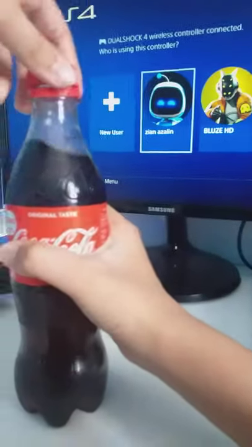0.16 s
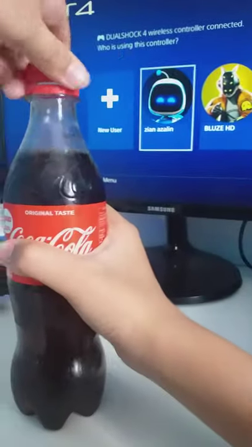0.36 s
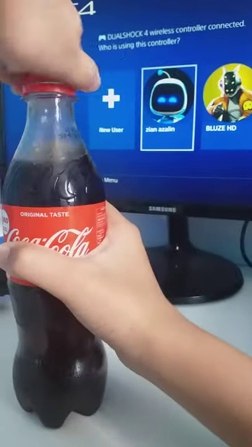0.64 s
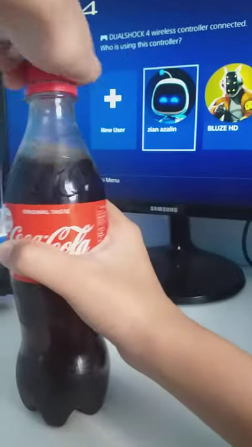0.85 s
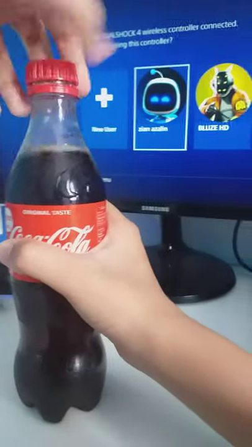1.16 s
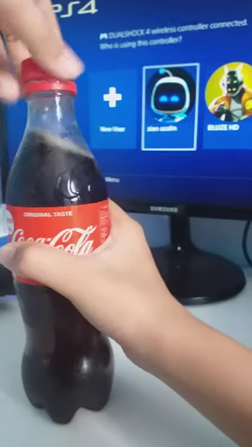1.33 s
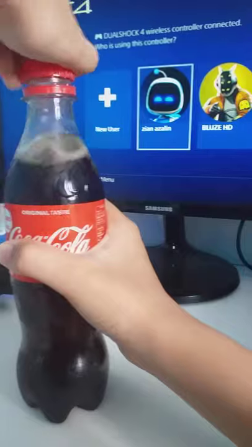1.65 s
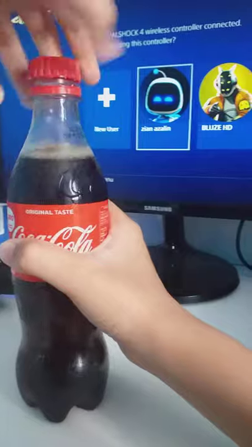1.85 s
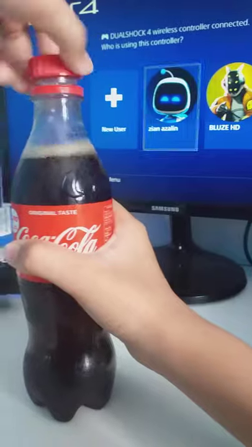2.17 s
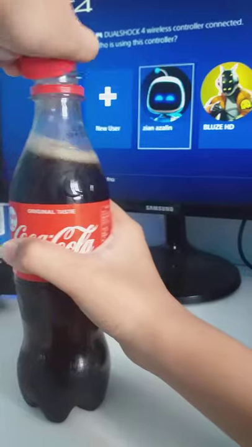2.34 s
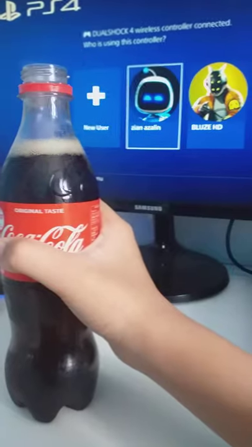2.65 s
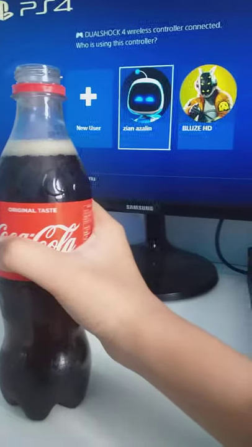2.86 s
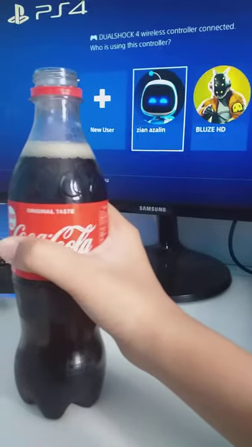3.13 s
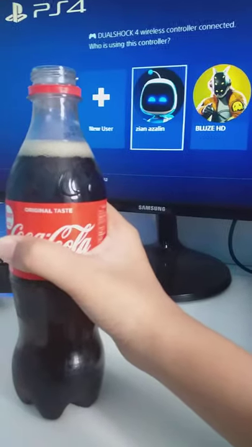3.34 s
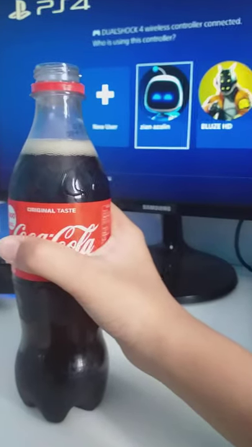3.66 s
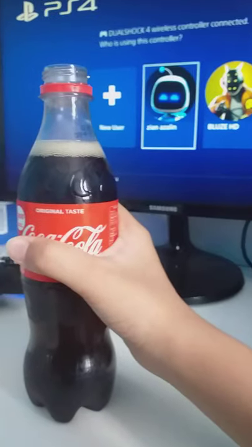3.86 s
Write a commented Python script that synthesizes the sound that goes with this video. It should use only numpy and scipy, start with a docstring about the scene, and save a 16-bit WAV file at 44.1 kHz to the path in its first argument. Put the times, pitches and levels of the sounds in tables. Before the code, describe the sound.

Plastic bottle cap being unscrewed with a gas puff and clicks, then clattering onto a desk

```python
"""A plastic screw cap is twisted off a soda bottle, close to a phone microphone in a small quiet room.
Shaped noise gives the room tone and hiss, random bubble clicks ring the bottle neck as a faint fizz,
and narrow noise whistles as a leak before a puff of gas. Seal and thread then crack and rub, ringing
the cap's modes; the hand thumps dully, the thread squeaks, and the neck pops as the cap comes free.
The cap drops on a desk, bounces, rolls and rattles to rest, ringing cap, desk and rim; the fizz goes on."""
import sys
import numpy as np
from scipy import signal
from scipy.io import wavfile

SR = 44100
rng = np.random.default_rng(int(sys.argv[2]) if len(sys.argv) > 2 else 0)


def inscribe(sig):
    """Save sig as 16-bit PCM at rate SR to the path in sys.argv[1].

    A 1-D sig is mono; a 2-D sig holds one channel per row.
    Samples are clipped to [-1, 1] before scaling.
    """
    pcm = np.round(np.clip(np.atleast_2d(sig).T, -1, 1) * 32767)
    wavfile.write(sys.argv[1], SR, pcm.astype(np.int16))


def volts(x):
    """Linear amplitude factor 10**(x/20) for a level x in dB, scalar or array-like."""
    e = np.asarray(x, float) / 20
    return 10 ** e


N = 176400   # four seconds of samples
BASS_BELOW_HZ, TREBLE_ABOVE_HZ = 1800, 6000   # how the cap's modes are grouped


def rms_one(x):
    """Scale to an average (rms) level of 1."""
    return x / np.sqrt(np.mean(x ** 2) + 1e-20)


def cut(x, hz, kind, order=2):
    """Butterworth filter."""
    return signal.sosfilt(signal.butter(order, hz, kind, fs=SR, output="sos"), x)


def in_time(rows):
    """Draw a curve through rows that start with a time; one value per sample for each other column."""
    s, *columns = np.transpose(rows)
    return [np.interp(np.arange(N) / SR, s, c) for c in columns]


def gated(rows):
    """Gain of a level curve, fading in and out over 20 ms at its ends."""
    t = np.arange(N) / SR
    fade = np.clip(np.minimum(t - rows[0][0], rows[-1][0] - t) * 50, 0, 1)
    return volts(in_time(rows)[0]) * fade


def at_hz(points, hz):
    """Read a table of (Hz, value) on a logarithmic pitch axis."""
    table_hz, values = np.transpose(points)
    return np.interp(np.log(hz), np.log(table_hz), values)


def drift(rate):
    """Slow random wandering: 'rate' fresh values per second, joined by lines."""
    knots = rng.standard_normal(400)
    return np.interp(np.arange(N) / SR * rate, np.arange(400), knots)


def grains(per_s, spread_db):
    """Random clicks of uneven size and either sign."""
    sizes = volts(spread_db * np.minimum(rng.exponential(1, N), 5)) * rng.choice([-1, 1], N)
    return sizes * (rng.random(N) < per_s / SR)


def ring(clicks, hz, t60):
    """A resonance: a click of size 1 starts a sine of height 1 that falls 60 dB in t60 seconds."""
    r, w = volts(-60 / (max(t60, 1 / hz) * SR)), 2 * np.pi * hz / SR
    return signal.lfilter([0, np.sin(w)], [1, -2 * r * np.cos(w), r * r], clicks + 1e-18)


# edges of the third-octave bands, in Hz
EDGES_HZ = np.minimum(30 * 2 ** np.arange(0, 9.4, 1 / 3), 17000)


def bands(x):
    """Split a sound into third-octave bands, each with its centre in Hz."""
    for low, high in zip(EDGES_HZ, EDGES_HZ[1:]):
        yield np.sqrt(low * high), cut(x, [low, high], "band")


def coloured(spectrum, patchy_db):
    """Noise of a given spectrum, each band wavering a little."""
    out = 0
    for hz, band in bands(rng.standard_normal(N)):
        out = out + volts(at_hz(spectrum, hz) + patchy_db * drift(11)) * band
    return rms_one(out)


def strike(s, db, modes, detune=0., scatter_db=3.5):
    """Blows at times s, with db as blows x modes: after a short loading, each mode rings and dies away."""
    load_s, slip_s = 0.0008, 0.0003   # fixed wait, and largest random extra wait of each mode
    shape = (len(s), len(modes))
    luck, late, bend = rng.standard_normal(shape), rng.random(shape), rng.standard_normal(shape)
    hz, level_db, t60 = np.transpose(modes)[:, :, None]
    out, t = np.zeros(N + SR), np.arange(SR // 8) / SR
    for k, start in enumerate(s):
        age = np.maximum(t - load_s - slip_s * late[k, :, None], 0)
        decay_db = -60 * age / np.maximum(t60, 1 / hz)
        size = volts(db[k, :, None] + level_db + scatter_db * luck[k, :, None] + decay_db)
        rings = size * np.sin(2 * np.pi * hz * (1 + detune * bend[k, :, None]) * age)
        # neighbouring modes push in opposite directions
        out[int(start * SR):][:len(t)] += rings[::2].sum(axis=0) - rings[1::2].sum(axis=0)
    return out[:N]


# Level of the room tone. Each row: time in seconds, level in dB.
AIR_LEVEL = [(0, -72), (.4, -75), (.48, -85.5), (.62, -70), (1.2, -63), (1.65, -67), (1.8, -63), (4, -65)]
# Colour of the room tone. Each row: pitch in Hz, relative level in dB per Hz.
AIR_COLOUR = [(45, -5.5), (95, -0.5), (215, -12.5), (400, -15), (1000, -20.5), (1800, -33.5), (2400, -30.5),
              (5000, -26), (9500, -35.5), (16000, -31)]


def room_tone():
    """Quiet background noise, strongest in the bass, whose bands waver gently."""
    air = cut(coloured(AIR_COLOUR, patchy_db=2.0), 38.1, "high", order=4)
    return volts(in_time(AIR_LEVEL)[0]) * air


# Level of the treble hiss. Each row: time in seconds, level in dB.
HISS_LEVEL = [(0, -86), (.49, -81), (.55, -77), (.72, -70.5), (1.65, -92), (2.5, -73), (4, -80)]


def treble_hiss():
    """Plain noise above 3 kHz that swells and fades."""
    return volts(in_time(HISS_LEVEL)[0]) * rms_one(cut(rng.standard_normal(N), 3000, "high"))


# Lowest air mode of the neck, rising as the cap lifts. Each row: time in seconds, pitch in Hz.
NECK_GLIDE = [(0, 597), (2.0, 521), (2.2, 567), (2.245, 670), (2.276, 764), (2.7, 850)]


def neck_air(x):
    """A resonance whose centre glides: shift down, low-pass, shift back."""
    width_hz = 22.7
    turn = np.exp(2j * np.pi * np.cumsum(in_time(NECK_GLIDE)[0]) / SR)
    r = np.exp(-np.pi * width_hz / SR)
    return 2 * np.real(turn * signal.lfilter([1 - r], [1, -r], x / turn))


# Loudness of the bubbles heard through the neck. Each row: time in seconds, relative level in dB.
FIZZ_LEVEL = [(0, -78), (.45, -77.5), (1.9, -68), (2.5, -72), (3, -74), (4, -71.5)]
# Upper air modes of the neck. Each row: pitch in Hz, width in Hz, relative level in dB.
NECK_MODES = [(2370, 180, -6.5), (3900, 140, -0.5)]


def fizz():
    """Bursting bubbles, as random clicks, excite the air column of the neck."""
    fizz_db, glide_db = -4.5, -7   # whole fizz, and its share through the lowest air mode
    bursts = grains(1700 * volts(1.1 * drift(44)), 5.1)   # around 1700 bursts per second
    out = volts(glide_db) * rms_one(neck_air(bursts))
    for hz, width, db in NECK_MODES:
        t60 = np.log(1000) / np.pi / width   # a wider mode dies sooner
        out = out + volts(db) * rms_one(ring(bursts, hz, t60))
    return volts(in_time(FIZZ_LEVEL)[0] + fizz_db) * out


# Thin whistle before the seal gives. Each row: time in seconds, level in dB.
LEAK_LEVEL = [(0, -83), (.3, -75.5), (.45, -96)]


def leak():
    """Gas whistles thinly: noise through two narrow resonances at one pitch, one slightly wider, in a row."""
    hz, width_hz = 5080, 730
    once = ring(rng.standard_normal(N), hz, 2.2 / width_hz)
    whistle = rms_one(ring(once, hz, 2.0 / width_hz))
    from_before = [(-1, LEAK_LEVEL[0][1])] + list(LEAK_LEVEL)   # already sounding at the start
    return gated(from_before) * whistle


# Colour of the escaping gas. Each row: pitch in Hz, relative level in dB per Hz.
GAS_COLOUR = [(1000, -38), (2000, -18), (3500, -8.5), (5200, 2), (7500, -1), (9300, -3), (12500, 1),
              (16000, -5.5)]


def puff():
    """Gas rushes out: noise under a short hump, with a softer skirt that fades more slowly."""
    peak_s, peak_db, hump_s = 0.3337, -42.5, 0.0098
    tail_db, rise_t60_s, fall_t60_s = -7, 0.1, 0.21   # tail level is relative to the hump
    t = np.arange(N) / SR - peak_s
    hump = np.exp(-(t / hump_s) ** 2 / 2)
    tail = volts(tail_db - 60 * np.abs(t) / np.where(t > 0, fall_t60_s, rise_t60_s))
    return volts(peak_db) * (hump + tail) * coloured(GAS_COLOUR, patchy_db=0.1)


# Ringing modes of the cap. Each row: pitch in Hz, relative level in dB, time to fall 60 dB in seconds.
CAP_MODES = [(980, -10, 0.0068), (1383, -10.5, 0.0073), (1980, -19.5, 0.0043), (2533, -7.5, 0.0068),
             (3090, 1.5, 0.0044), (3900, -0.5, 0.0059), (4540, 4, 0.0042), (5346, -8.5, 0.014),
             (6330, -4, 0.0044), (7560, -2, 0.0038), (11930, -1.5, 0.0026), (14700, -3, 0.002)]


def cap_blows(rows):
    """Sharp blows ring the cap, favouring the modes near each blow's strongest pitch."""
    blow_db, favour_db, favour_octaves = -13, 8.5, 0.32
    s, db, peak_hz, bass_db, treble_db = np.transpose(rows)[:, :, None]
    hz = np.array(CAP_MODES)[:, 0]
    level = db + blow_db + favour_db * np.exp(-(np.log2(hz / peak_hz) / favour_octaves) ** 2)
    level = level + bass_db * (hz < BASS_BELOW_HZ) + treble_db * (hz > TREBLE_ABOVE_HZ)
    # detune: each blow finds the modes at a slightly different pitch
    return strike(s[:, 0], level, CAP_MODES, detune=0.05, scatter_db=2)


# Seal and thread cracks. Each row: start in seconds, relative strength in dB, strongest pitch in Hz,
# extra bass in dB, extra treble in dB.
CRACKS = [(0.4987, -23, 4180, -4, 9), (0.5209, -38, 6000, -12, 12), (0.531, -29.5, 9000, -27, 15),
          (0.565, -16.5, 4900, -3, 8.5), (0.601, -37, 3560, -7, -3), (0.789, -24, 3360, -0.5, -6),
          (0.976, -19.5, 3480, -23, -7), (1.0326, -32, 2430, 7.5, -17), (1.0561, -32, 3900, -9, -5),
          (1.0726, -31, 3020, 9.5, -4), (1.1875, -39, 3740, -12, -14), (1.2, -37.5, 3840, -4, 0.5),
          (1.2484, -17.5, 4650, -29, -6), (1.354, -30.5, 4130, 7, -5), (1.4111, -34, 2740, 18.5, -17),
          (1.419, -35, 3800, -6, -6), (1.48, -31.5, 3700, 16.5, -20), (1.5064, -45, 3900, 6, -2),
          (1.7406, -20.5, 2370, -1.5, -11), (1.894, -26.5, 4140, -35, 9), (2.038, -28, 3870, -26, -17),
          (2.0651, -28.5, 3660, -19, -19), (2.1338, -30.5, 3870, -15, 4), (2.1438, -33.5, 3570, 10, -8),
          (2.1991, -18, 2870, 11.5, -12), (2.2423, -19.5, 4000, 13.5, -2), (2.274, -19, 4130, 12, 0.5)]


def cracks():
    """Seal and thread give way in sudden jerks that ring the cap."""
    return cap_blows(CRACKS)


# How long the room rings. Each row: pitch in Hz, time to fall 60 dB in seconds.
ROOM_T60 = [(200, 0.95), (1000, 0.44), (4000, 0.3), (8000, 0.28), (15000, 0.39)]


def room(close, far):
    """Reflections from screen and bottle close by, and a far-wall tail that dies band by band."""
    near_db, near_t60_s, far_db = -2.5, 0.017, -9.5
    t = np.arange(SR // 2) / SR
    near = rng.standard_normal(len(t)) * volts(-60 * t / near_t60_s) * (t > 0.001)
    near = volts(near_db) * near / np.linalg.norm(near)
    tail = sum(b * volts(-60 * t / at_hz(ROOM_T60, hz)) for hz, b in bands(rng.standard_normal(len(t))))
    tail = volts(far_db) * tail * (t > 0.004) / np.linalg.norm(tail)
    return (signal.fftconvolve(close, near) + signal.fftconvolve(far, tail))[:N]


# Turns of the cap rubbing on the thread. Each row: start in seconds, length in seconds,
# level of the upper modes in dB, relative bass in dB.
RUBS = [(0.57, 0.24, -69.5, -31), (0.981, 0.19, -59.5, -0.5), (1.154, 0.31, -73.5, 8),
        (1.367, 0.16, -64.5, -4), (1.471, .11, -53, -13), (1.674, 0.054, -66.5, -6),
        (1.993, 0.048, -60, 1.5), (2.023, 0.2, -53, -4.5), (2.168, 0.2, -53.5, 1),
        (2.276, 0.37, -66.5, 1.5)]


def rubbing():
    """The thread sticks and slips: clumps of tiny clicks ring the cap's modes, turn by turn."""
    treble_trim_db, bass_trim_db, edge_s = -12, -6.5, 0.019
    t = np.arange(N) / SR
    # two streams of slips, shared out among the modes
    slips = [grains(1200 * volts(9 * drift(90)), 4) for _ in range(2)]
    low, high = 0, 0
    for k, (hz, db, t60) in enumerate(CAP_MODES):
        sound = ring(slips[k % 2], hz, t60) * volts(db + treble_trim_db * (hz > TREBLE_ABOVE_HZ))
        if hz < BASS_BELOW_HZ:
            low = low + sound
        else:
            high = high + sound
    low, high = rms_one(low), rms_one(high)
    out = np.zeros(N)
    for s, length, db, bass_db in RUBS:
        # quick rise, then a fade over the second half
        shape = np.clip(np.minimum((t - s) / edge_s, 2 * (s + length - t) / length), 0, 1)
        out += volts(db) * shape * (high + volts(bass_db + bass_trim_db) * low)
    return out


# Hand on the bottle. Each row: time in seconds, level in dB.
THUMP_LEVEL = [(0.95, -74), (1.056, -52.5), (1.2, -85), (1.7, -80), (1.75, -56), (1.86, -81)]


def hand_thump():
    """Dull pushes of the hand: low noise that swells and fades."""
    low_hz, high_hz = 70.6, 240
    noise = cut(cut(rng.standard_normal(N), high_hz, "low", order=1), low_hz, "high")
    return gated(THUMP_LEVEL) * rms_one(cut(noise, 4 * high_hz, "low"))


# Squeaks of the thread. Each row: middle in seconds, pitch in Hz, level in dB,
# time from the middle to about a third of the height in seconds.
SQUEAKS = [(1.399, 1480, -50, .009)]


def squeak():
    """The thread squeaks: a short tone under a bell-shaped hump."""
    t = np.arange(N) / SR
    return sum(volts(db) * np.exp(-((t - s) / length) ** 2) * np.sin(2 * np.pi * hz * t)
               for s, hz, db, length in SQUEAKS)


# Pops of the neck. Each row: start in seconds, level in dB, pitch in Hz, time to fall 60 dB in seconds.
POPS = [(2.276, -30.5, 755, 0.06)]


def pop():
    """The neck rings as the cap comes free."""
    return sum(ring(volts(db) * (np.arange(N) == int(s * SR)), hz, t60) for s, db, hz, t60 in POPS)


# Cap landing on the desk. Each row: start in seconds, relative strength in dB, strongest pitch in Hz,
# extra bass in dB, extra treble in dB.
DROPS = [(3.152, -7, 4360, -2.5, 2.5), (3.1573, -18.5, 4340, -25, -21), (3.2992, -17.5, 7400, -10, -2.5),
         (3.303, -18, 7300, 7.5, 4), (3.311, -9.5, 7600, -31, 5), (3.316, -14, 4400, -10, 6),
         (3.3189, -30, 4070, -24, 9)]


def landings():
    """The cap itself rings as it lands, its treble dulled above about 8.5 kHz."""
    return cut(cap_blows(DROPS), 8450, "low")


# A single desk mode below the crowd: pitch in Hz, relative level in dB, time to fall 60 dB in seconds.
DESK_BELOW_CROWD = (468, 1, .1)


def desk_modes():
    """A single longer mode, and above it a crowd of short modes, shorter the higher they are."""
    from_hz, to_hz, cycles, tilt_db = 874, 2847, 53.6, 1   # each rings for so many cycles; tilt per octave
    crowd_hz = np.geomspace(from_hz, to_hz, num=22) * rng.uniform(0.98, 1.02, 22)
    return [DESK_BELOW_CROWD] + [(hz, tilt_db * np.log2(hz / from_hz), cycles / hz) for hz in crowd_hz]


def desk_knocks(modes):
    """Landings and rim touches set the desk ringing."""
    knock_db, touch_db = -32, 11   # all knocks; extra for the rim touches
    knocks = [row[:2] for row in DROPS] + [(s, db + touch_db) for s, db in TOUCHES]
    s, db = np.transpose(knocks)
    return strike(s, db[:, None] + knock_db + np.zeros(len(modes)), modes, scatter_db=2)


def desk_boom():
    """The desk's low boom under the first landing."""
    hz, db, t60_s = 117.8, -50.5, 0.48
    landing = volts(db) * (np.arange(N) == int(DROPS[0][0] * SR))
    return cut(ring(landing, hz, t60_s), hz * np.array([0.6, 1.4]), "band")


# Cap rolling on the desk. Each row: time in seconds, level in dB.
ROLL_LEVEL = [(3.33, -42), (3.48, -54), (3.6, -65.5), (3.85, -73), (3.95, -107)]


def rolling(modes):
    """The rolling cap's many tiny bumps keep the desk's modes ringing."""
    bumps = grains(900, 4.83)
    return gated(ROLL_LEVEL) * rms_one(sum(volts(db) * ring(bumps, hz, t60) for hz, db, t60 in modes))


# Rim touches as the cap rattles to rest. Each row: start in seconds, relative strength in dB.
TOUCHES = [(3.3566, -27), (3.3694, -44), (3.3807, -31), (3.3894, -34), (3.3978, -30), (3.4066, -35),
           (3.4153, -36), (3.422, -39), (3.4284, -39), (3.4341, -37.5), (3.4393, -36), (3.444, -48),
           (3.454, -45), (3.4847, -45), (3.5413, -46), (3.6266, -53), (3.677, -63)]
# Ringing of the rim. Each row: pitch in Hz, relative level in dB, time to fall 60 dB in seconds.
RIM_MODES = [(7540, 4.5, 0.0023)]


def rim():
    """Each touch ticks in the rim's modes."""
    s, db = np.transpose(TOUCHES)
    ticks = strike(s, db[:, None] + 5.5 + np.zeros(len(RIM_MODES)), RIM_MODES)
    return cut(ticks, [6300, 8600], "band")


def scene():
    """Mix all sources, with the room around the cap and the desk."""
    neck_db, drop_wet_db, rim_wet_db = 4, 7, 3.5   # the desk is farther off, so it gets more room
    background = room_tone() + treble_hiss() + fizz()
    gas = leak() + puff()
    cap = cracks() + rubbing()
    hand = cap + volts(neck_db) * neck_air(cap) + squeak() + pop()
    hand = cut(hand, 278, "high", order=3)   # the small cap radiates no bass
    modes = desk_modes()
    drop = cut(landings() + desk_knocks(modes) + rolling(modes), 326, "high")
    ticks = rim()
    wet = room(hand + drop, hand + volts(drop_wet_db) * drop + volts(rim_wet_db) * ticks)
    thumps = hand_thump() + desk_boom()
    return (background + gas + hand + thumps + drop + ticks + wet)[None]


def low_pass(x):
    """Removes everything above the highest recorded frequency."""
    return signal.sosfilt(signal.butter(12, 16840, fs=SR, output="sos"), x)


def record(dry):
    """The microphone: a partial dip in its treble, then a steep top cut."""
    dip_hz, dip_width_hz, dip_share = 10160, 2500, 0.4
    b, a = signal.iirpeak(dip_hz, dip_hz / dip_width_hz, fs=SR)
    dipped = dry - dip_share * signal.lfilter(b, a, dry)
    mix = signal.sosfilt(signal.cheby2(8, 30, 16400, fs=SR, output="sos"), dipped)
    return low_pass(mix)


dry = scene()
out = record(dry)
inscribe(out)
```